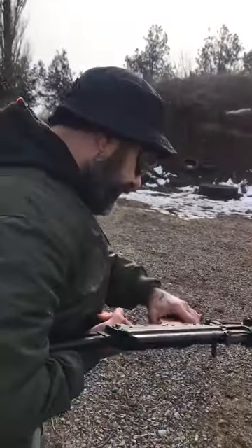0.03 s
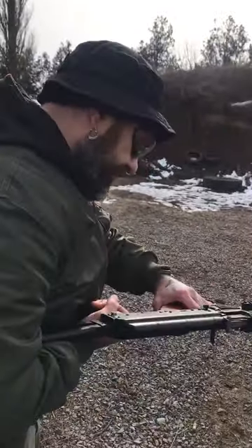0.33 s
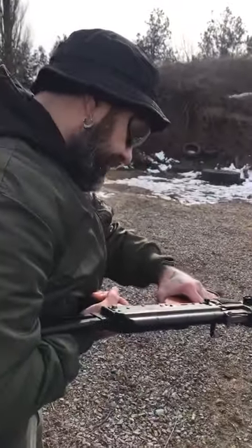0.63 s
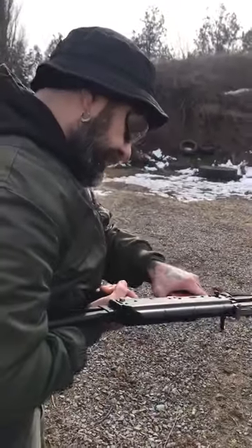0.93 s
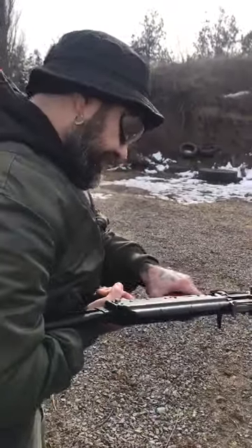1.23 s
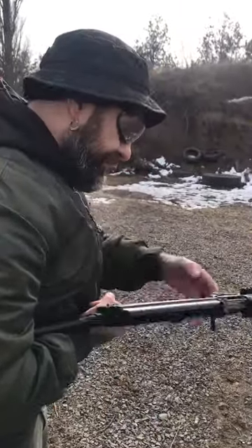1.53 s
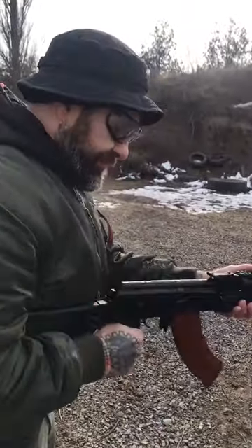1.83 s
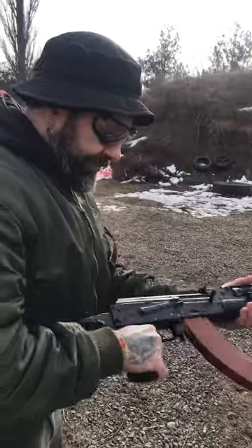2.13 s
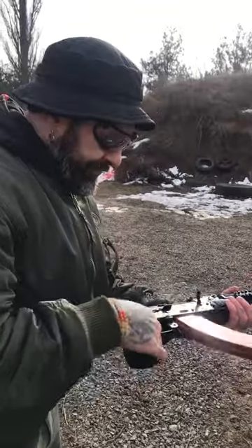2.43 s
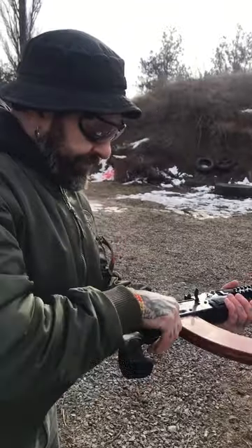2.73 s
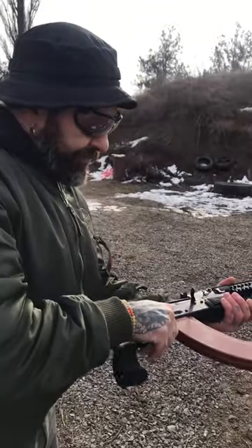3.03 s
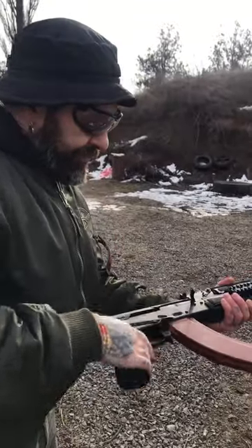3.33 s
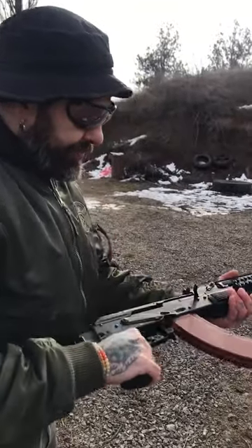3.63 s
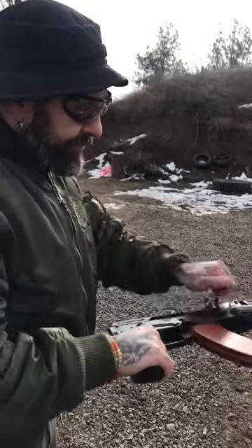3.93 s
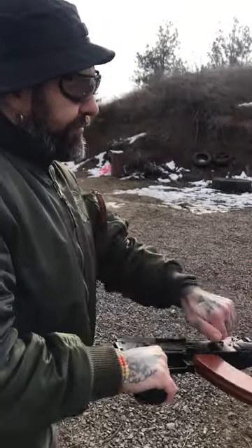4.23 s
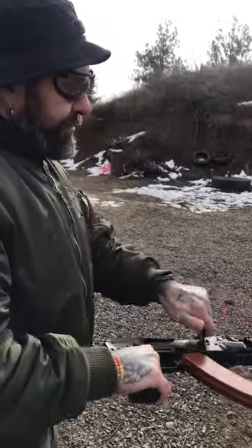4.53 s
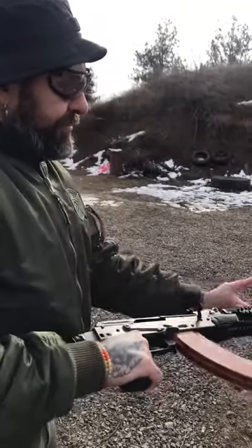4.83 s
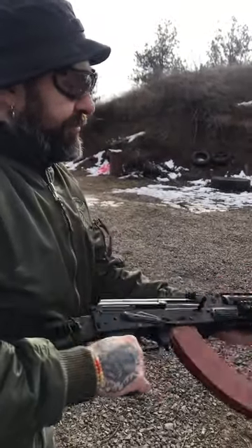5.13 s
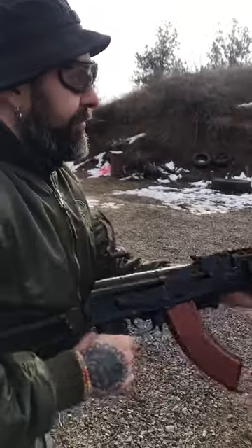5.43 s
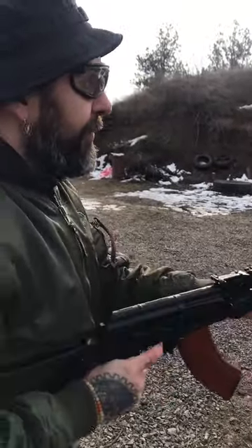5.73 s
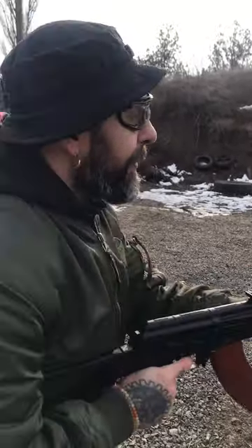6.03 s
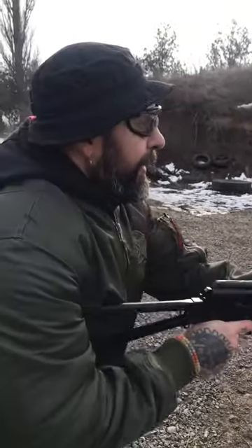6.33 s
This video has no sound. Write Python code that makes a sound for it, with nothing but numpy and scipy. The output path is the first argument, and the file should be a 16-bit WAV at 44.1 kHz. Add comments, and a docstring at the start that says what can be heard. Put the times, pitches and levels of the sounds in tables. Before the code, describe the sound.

Close metallic clicks, rattles and clacks of a rifle being loaded and cocked, with nylon sleeve swishes and wind rumbling on the microphone.

```python
"""A nylon sleeve swishes and creases in the breeze, and a rifle magazine knocks home, close to the microphone.
Loose steel parts rattle, the safety lever snaps down, then the bolt is hauled back and slams shut.
Each contact is a crack of noise that sets the steel ringing; the jacket rubs, crinkles and finally squeaks.
Wind buffets the microphone, and the gravel and earth banks of the range send back a faint echo."""
import sys
import numpy as np
from scipy import signal
from scipy.fft import rfft, irfft, next_fast_len
from scipy.io import wavfile

SR = 44100
rng = np.random.default_rng(int(sys.argv[2]) if len(sys.argv) > 2 else 0)


def wav_record(signal):
    """Record a signal, one row per channel, as 16-bit PCM in the file named by sys.argv[1]."""
    frames = np.transpose(np.atleast_2d(signal))
    bounded = np.clip(frames, -1, 1)
    # unit amplitude maps onto the largest positive 16-bit level
    quanta = np.round(bounded * 32767).astype(np.int16)
    wavfile.write(sys.argv[1], SR, quanta)


N = 290883
TIME = np.arange(N) / SR


def from_db(db):
    """Decibels to gain."""
    return 10 ** (np.asarray(db) / 20)


def rms_one(x):
    """Scale to an rms of one."""
    return x / np.sqrt(np.mean(x ** 2) + 1e-20)


def automation(rows):
    """Each column of a breakpoint curve at every sample."""
    times, *columns = np.transpose(rows)
    return [np.interp(TIME, times, column) for column in columns]


def swells(rows, steepness=2):
    """Gain that swells and fades for each row of middle_s, length_s, level_db."""
    return sum(from_db(db) * np.exp(-np.minimum(np.abs(2 * (TIME - middle) / length) ** steepness, 20))
               for middle, length, db in rows)


def taps(rows):
    """One impulse for each blow, as strong as the blow."""
    out = np.zeros(N)
    for start, db, *_ in rows:
        out[round(start * SR)] += from_db(db)
    return out


def drift(rate_hz):
    """A random wander with a spread of about one."""
    knots = rng.standard_normal(N // 20)
    return np.interp(TIME * rate_hz, np.arange(len(knots)), knots)


def spike_sizes(spread_db):
    """Random sizes of either sign: many small, a few large."""
    return from_db(spread_db * np.minimum(rng.exponential(1, N), 3)) * rng.choice([-1, 1], N)


def band(x, low_hz, high_hz, order=2):
    """Causal band-pass."""
    sos = signal.butter(order, [low_hz, min(high_hz, .45 * SR)], "band", fs=SR, output="sos")
    return signal.sosfilt(sos, x + 1e-18)


def coloured(x, spectrum):
    """Give a steady noise a spectrum; rms one."""
    hz, db = np.transpose(spectrum)
    size = next_fast_len(N)
    log_hz = np.log(np.maximum(np.fft.rfftfreq(size, 1 / SR), 1))
    gain = from_db(np.interp(log_hz, np.log(hz), db, left=-90, right=-90))
    return rms_one(irfft(rfft(x, size) * gain, size)[:N])


def body(force, resonances, direct_db):
    """A steel part passes the crack and sings briefly at its two-pole resonances."""
    out = from_db(direct_db) * force
    for hz, width_hz, db in resonances:
        radius = np.exp(-np.pi * width_hz / SR)
        poles = [1, -2 * radius * np.cos(2 * np.pi * hz / SR), radius ** 2]
        gain = from_db(db) * (1 - radius ** 2) / 2
        out += signal.lfilter([gain, 0, -gain], poles, force + 1e-18)
    return out


def ring(blows, modes):
    """Every blow sets the modes ringing as dying sines."""
    out = np.zeros(N)
    for hz, db, t60 in modes:
        radius, angle = from_db(-60 / (t60 * SR)), 2 * np.pi * hz / SR
        poles = [1, -2 * radius * np.cos(angle), radius ** 2]
        out += signal.lfilter([0, from_db(db) * np.sin(angle)], poles, blows + 1e-18)
    return out


def contacts(rows, t60_s, dulling, crack_db, crack_s, rise_s, grain_db, bands_db, ping_db=-13):
    """Each contact is a crack and a dying chatter; dulling gives gentler touches a larger share of lows."""
    t = np.arange(SR // 6) / SR
    edges_hz = np.array([(740, 1460), (1700, 4600), (4900, 12000)])
    low_db, mid_db, high_db = bands_db
    decay = from_db(-60 * t / t60_s)
    crack = from_db(crack_db) * np.exp(-t / crack_s)
    bite = 1 - np.exp(-t / rise_s)   # parts that slide into each other take a moment to bite
    force = np.zeros((3, N + len(t)))
    for start, db, treble_db in rows:
        grain = from_db(grain_db * np.repeat(rng.standard_normal(len(t)), SR // 1500)[:len(t)])
        burst = rng.standard_normal((3, len(t))) * (grain * decay + crack) * bite
        burst /= np.sqrt(np.mean(burst[:, :SR // 250] ** 2, axis=1, keepdims=True))   # attack at rms one
        # every point of contact favours a few modes of its own in the mids and highs
        pings_hz = rng.uniform(edges_hz[1:, :1], edges_hz[1:, 1:], size=(2, 3))
        pings = np.sin(2 * np.pi * pings_hz[..., None] * t).sum(axis=1)
        burst[1:] += from_db(ping_db) * pings * decay * bite
        tone_db = np.array([[low_db - dulling * db], [mid_db], [high_db + treble_db]])
        at = round(start * SR)
        force[:, at:at + len(t)] += burst * from_db(db + tone_db)
    return sum(band(part[:N], low, high) for part, (low, high) in zip(force, edges_hz))


# tone of the open air: frequency_hz, density_db
AIR_SPECTRUM = [(35, -29.5), (60, -0.5), (139, -18.5), (432, -22), (858, -21), (1310, -30.5), (3470, -28.5),
                (8800, -43.5), (12000, -43), (15600, -67.5), (22000, -120)]


def open_air(level_db=-63.5):
    """A quiet, steady bed of low noise."""
    return from_db(level_db) * coloured(rng.standard_normal(N), AIR_SPECTRUM)


# the wind's deep rumble and its low-mid buffeting: frequency_hz, density_db
RUMBLE_SPECTRUM = [(20, -32), (35, -8), (55, 1), (85, -3.5), (125, -11.5), (180, -20), (320, -41)]
BUFFET_SPECTRUM = [(60, -12.5), (110, -2), (140, 4), (230, -1), (350, -5.5), (520, -18), (800, -32),
                   (1300, -44)]
# rise and fall of the breeze: time_s, strength_db
BREEZE_CURVE = [(0, -34.5), (.5, -42.5), (.75, -39.5), (1.05, -43.5), (1.5, -49.5), (1.7, -38.5),
                (2.25, -32.5), (2.7, -50), (3.0, -43.5), (3.3, -44.5), (3.5, -48.5), (4.15, -58),
                (4.28, -39), (4.7, -41), (5.25, -41.5), (5.5, -56), (6.1, -55), (6.6, -54)]
# gusts on top of it, and the dull low thumps of the magazine going home at 0.257 s and 1.205 s: middle_s,
# length_s, rumble_db, buffet_db
LOW_SWELLS = [(0.257, 0.065, -28.5, -63), (0.861, .12, -37.5, -53.5), (1.205, .22, -45, -73.5),
              (1.624, 0.048, -40, -65), (2.358, 0.15, -26, -30.5), (2.492, 0.047, -29, -65),
              (2.822, 0.054, -40.5, -67), (3.072, 0.051, -37, -49), (3.366, 0.11, -47, -90),
              (3.955, 0.015, -42, -53), (4.383, 0.18, -37, -33.5), (4.581, 0.11, -41.5, -38.5),
              (4.791, 0.072, -32, -34.5), (5.033, .18, -41, -50), (5.313, 0.068, -40, -75),
              (6.302, 0.086, -49.5, -58)]
# single puffs: middle_s, level_db
WIND_PUFFS = [(2.336, -19.5), (2.367, -22), (3.08, -21.5), (4.409, -22), (4.78, -23)]


def wind(buffet_follows=.55, eddy_db=3, eddies_per_s=30, puff_hz=197):
    """Eddies rumble unevenly on the microphone, gusts also buffet it, and the magazine's heavier knocks swell
    as dull low thumps; a puff is one swing of pressure."""
    breeze_db, = automation(BREEZE_CURVE)
    rumble = from_db(breeze_db - 1)
    rumble += swells([(s, length, db) for s, length, db, _ in LOW_SWELLS], steepness=4)
    buffet = from_db(buffet_follows * breeze_db - 40)
    buffet += swells([(s, length, db) for s, length, _, db in LOW_SWELLS], steepness=4)
    out = rumble * coloured(rng.standard_normal(N), RUMBLE_SPECTRUM)
    out += buffet * coloured(rng.standard_normal(N), BUFFET_SPECTRUM)
    out *= from_db(eddy_db * drift(eddies_per_s))
    for middle, db in WIND_PUFFS:
        cycles = np.clip((TIME - middle) * puff_hz, -5, 5)
        out += from_db(db) * np.sin(2 * np.pi * cycles) * np.exp(-(cycles / .69) ** 2)
    return out


# slapback from the earth banks: delay_s, level_db
BANK_ECHOES = [(0.051, -29), (0.073, -32), (0.116, -39), (.208, -57), (0.226, -43)]


def outdoors(x, bounce_s=.0071, scatter_db=-31, scatter_t60_s=.15, smear_s=.0069):
    """Add a bounce off the ground, dull scatter from gravel and smeared echoes from the banks."""
    t = TIME[:SR // 2]
    scatter = rng.standard_normal(len(t)) * from_db(-60 * t / scatter_t60_s) * (t > .008)
    response = from_db(scatter_db) * scatter / np.linalg.norm(scatter)
    for delay, db in BANK_ECHOES:
        echo = rng.standard_normal(len(t)) * np.exp(-np.abs(t - delay) / smear_s)
        response += from_db(db) * band(echo / np.linalg.norm(echo), 1100, 3600, order=1)
    far = band(signal.fftconvolve(x, response)[:N], 700, 6500, order=1)
    bounce = np.interp(TIME - bounce_s, TIME, x, left=0)
    return x + from_db(-22) * bounce + far


# nylon squeaks on nylon: time_s, pitch_hz, level_db
SQUEAK_CURVE = [(6.15, 1150, -66), (6.2, 1500, -55), (6.25, 1660, -53), (6.29, 1670, -49),
                (6.33, 1680, -76)]


def squeak(waver=.049, flutter_db=4.8):
    """The weave catches at a quick, unsteady rate that rises with the speed of the sleeve."""
    hz, db = automation(SQUEAK_CURVE)
    phase = 2 * np.pi * np.cumsum(hz * (1 + waver * drift(390))) / SR
    sliding = (TIME > SQUEAK_CURVE[0][0]) & (TIME < SQUEAK_CURVE[-1][0])
    return sliding * from_db(db + flutter_db * drift(120)) * np.sin(phase)


# the jacket's loudest creases: start_s, level_db, treble_db
CREASE_SNAPS = [(.081, -31, -12), (.13, -34, -14), (.143, -34.5, -28), (.2, -23, -16), (.213, -24.5, -33),
                (.293, -35, -24), (.36, -38, -6), (5.761, -24, -22), (5.779, -34, -25), (5.791, -34.5, -24)]


def creases():
    """A fold snaps as it gives way, and the padding flaps."""
    snaps = contacts(CREASE_SNAPS, t60_s=.017, dulling=0, crack_db=17.5, crack_s=.00027,
                     rise_s=.0001, grain_db=12, bands_db=(6.5, -3.5, -4))
    flaps = band(from_db(25.5) * taps(CREASE_SNAPS), 157, 485)
    return snaps + flaps


# the nylon's midrange rustle and bright hiss: frequency_hz, density_db
RUSTLE_SPECTRUM = [(150, -6), (480, -5.5), (850, 1.5), (1400, -0.5), (2800, -3.5), (4500, -9.5),
                   (8000, -21)]
HISS_SPECTRUM = [(1800, -10.5), (4000, 0), (6500, -1.5), (9500, -2), (12000, -7.5)]
# each arm move swishes the sleeve: middle_s, length_s, rustle_db, hiss_above_rustle_db
SLEEVE_SWISHES = [(0.173, 0.25, -56, -4), (0.737, 0.34, -66.5, 4), (1.922, 0.42, -61, -0.5),
                  (3.369, 0.11, -64, 5), (4.474, 0.31, -59, 3), (5.151, 0.12, -71, 8.5),
                  (5.431, 0.25, -62.5, -4), (5.656, 0.062, -47.5, -14), (5.726, 0.12, -63, -6.5),
                  (6.186, 0.66, -57, -4.5), (6.311, 0.026, -42, -4.5), (6.59, 0.33, -58.5, -4)]


def sleeves(resting_rustle_db=-71.5, resting_hiss_db=-72, max_crinkles_per_s=55, brisk_db=-57):
    """Nylon slides with a smooth hiss; the brisker the rub, the more often its folds crinkle."""
    rub = from_db(resting_rustle_db) + swells(row[:3] for row in SLEEVE_SWISHES)
    slide = from_db(resting_hiss_db)
    slide += swells((s, length, db + above) for s, length, db, above in SLEEVE_SWISHES)
    briskness = rub / from_db(brisk_db)
    sizes = from_db(27) * spike_sizes(spread_db=3)
    buckles = rng.random(N) < max_crinkles_per_s * np.minimum(briskness, 1) ** 2 / SR
    # past a brisk rub the hiss still grows, but the folds snap no louder
    crinkles = sizes * buckles / np.maximum(briskness, 1)
    rustle = coloured(rng.standard_normal(N) + crinkles, RUSTLE_SPECTRUM)
    hiss = coloured(rng.standard_normal(N) + from_db(-10) * crinkles, HISS_SPECTRUM)
    flicker = from_db(3 * drift(35))
    return (rub * rustle + slide * hiss) * flicker


# a hand pats the fore grip: middle_s, length_s, level_db
GRIP_PAT = [(4.779, 0.007, -40)]


def pat():
    """A palm lands with a short, dull thump."""
    return swells(GRIP_PAT) * rms_one(band(rng.standard_normal(N), 200, 900, order=3))


# clinks of the loose parts: start_s, level_db, treble_db
RATTLE_HITS = [(1.908, -20, -14), (2.042, -33.5, -16), (2.366, -33.5, -4.5), (2.38, -20, -24),
               (2.399, -23, -11), (3.403, -21, -9.5), (3.42, -27.5, -15), (3.471, -15, -11),
               (3.509, -23.5, -14), (3.523, -20.5, -13), (4.983, -35.5, -11), (5.408, -31.5, -12),
               (5.438, -29, -40), (5.489, -34.5, -16.5)]
# their resonances: pitch_hz, width_hz, gain_db
RATTLE_RESONANCES = [(954, 44, 11.5), (2197, 12.4, 7.5), (2385, 14, 3.5), (2820, 600, -7.5),
                     (4160, 155, -1), (4475, 11, -9), (5950, 1100, -16), (8600, 100, -6), (8800, 33, -22)]
# their ringing tails: pitch_hz, level_db, t60_s
RATTLE_TAILS = [(965, -21, 0.336), (2184, -23, 0.17), (2350, -8, 0.14), (2610, 0, 0.073), (2906, -14, 0.18),
                (4160, -37, 0.15)]


def rattles():
    """Loose steel parts clink and ring as the rifle is turned."""
    clinks = contacts(RATTLE_HITS, t60_s=.073, dulling=.81, crack_db=-2, crack_s=.0018,
                      rise_s=.00047, grain_db=0, bands_db=(-34.5, -1.5, 7))
    tails = from_db(-19) * ring(taps(RATTLE_HITS), RATTLE_TAILS)
    return body(clinks, RATTLE_RESONANCES, direct_db=-10) + tails


# ringing tails of the action: pitch_hz, level_db, t60_s
ACTION_TAILS = [(895, -10, 0.098), (1770, -10.5, 0.12), (2170, -1, 0.1), (2580, -25.5, 0.56),
                (2745, -13.5, .15), (3200, -27, .5), (3170, -9, 0.11), (4340, -21.5, 0.3),
                (5400, -17.5, 0.2), (7000, -24.5, 0.29)]


def action_ring(hits, send_db):
    """Magazine, lever and bolt all set the same steel action ringing."""
    return ring(from_db(send_db) * taps(hits), ACTION_TAILS)


def jolt(force, send_db):
    """The whole weapon thuds under the heavier blows."""
    return band(from_db(send_db) * force, 150, 420)


# steel slides on steel just before and after it catches: middle_s, length_s, level_db
STEEL_SCRAPES = [(.28, 0.086, -56), (.392, 0.0065, -49), (0.499, 0.026, -45.5), (0.548, 0.048, -47.5),
                 (0.833, .06, -50.5), (0.905, .05, -50), (0.955, 0.023, -48), (1.055, .01, -52.5),
                 (1.147, 0.028, -41.5), (1.23, 0.11, -52.5), (1.378, 0.055, -59.5), (4.258, .016, -46),
                 (4.506, .014, -42)]


def scrapes(slips_per_s=1400):
    """Tiny uneven slips, dense enough to grind, swell and fade with each push."""
    slips = spike_sizes(spread_db=4.5) * (rng.random(N) < slips_per_s / SR)
    return rms_one(band(slips, 520, 4200)) * swells(STEEL_SCRAPES)


# knocks and latch clicks of the magazine: start_s, level_db, treble_db
MAGAZINE_HITS = [(.2335, -12.5, -20.5), (.394, -13, -18), (.424, -31, -19), (.525, -29, -12),
                 (.544, -28.5, -7.5), (.8635, -13.5, -15), (.9, -29.5, -14), (1.058, -25, -3.5),
                 (1.156, -15, -1), (1.159, -5, -4), (1.163, -11.5, -6), (1.436, -45.5, -35),
                 (1.668, -36, -38), (1.677, -31.5, -41)]
# its shell: pitch_hz, width_hz, gain_db
MAGAZINE_RESONANCES = [(867, 34, 4.5), (1130, 49, 0), (1386, 130, 3.5), (1933, 54, 3), (2190, 130, -3),
                       (3187, 110, -11.5), (4400, 240, -10.5), (5500, 44, -3), (8860, 250, -2.5),
                       (8940, 53, -6.5)]


def magazine():
    """The magazine knocks and scrapes in its well, then latches; the same shell also carries the brief slides
    of steel as the bolt starts each stroke."""
    knocks = contacts(MAGAZINE_HITS, t60_s=.045, dulling=.3, crack_db=5, crack_s=.00077,
                      rise_s=.00014, grain_db=4, bands_db=(-12, -5, 1))
    shell = body(knocks + from_db(3.5) * scrapes(), MAGAZINE_RESONANCES, direct_db=-4)
    return shell + action_ring(MAGAZINE_HITS, send_db=-29) + jolt(taps(MAGAZINE_HITS), send_db=9.5)


# clicks of the safety lever: start_s, level_db, treble_db
LEVER_HITS = [(2.887, -28.5, -11.5), (2.974, -23.5, -4.5), (2.9792, 1, -7), (2.9993, -2.5, -4.5),
              (3.204, -22.5, -6)]
# its steel: pitch_hz, width_hz, gain_db
LEVER_RESONANCES = [(906, 44, 6), (1175, 45, -0.5), (1451, 79, 4), (3040, 270, -5), (4410, 200, 1),
                    (6310, 480, 2.5), (6740, 220, 4.5), (8760, 300, -3.5), (9700, 240, -3.5)]


def safety_lever():
    """The lever snaps through its detents with sharp cracks."""
    clicks = contacts(LEVER_HITS, t60_s=.043, dulling=.25, crack_db=11, crack_s=.001,
                      rise_s=.00036, grain_db=3.5, bands_db=(-13, -6, 0))
    return body(clicks, LEVER_RESONANCES, direct_db=-6.5) + action_ring(LEVER_HITS, send_db=-41)


# the bolt carrier chatters along its rails, back and then forward: start_s, end_s, first_db, last_db
CARRIER_STROKES = [(4.2615, 4.353, -9.5, -12), (4.528, 4.5628, -19.5, -8.5)]
# it rides over the hammer, hits its stop, is let go and slams shut: start_s, level_db, rebound_hold_s
CARRIER_HITS = [(4.2973, -5, 0), (4.3157, -5, 0), (4.3247, -3, 0.00082), (4.3513, -0.5, 0.0017),
                (4.368, -1, 0.0042), (4.515, -14, 0), (4.561, -2.5, 0.027)]


def bolt_blows(knocks=9, jitter=.2, rail_treble_db=-11, stop_treble_db=-6,
               rebound_s=.0045, fade_db_per_s=4199):
    """Uneven knocks along each stroke, and hard blows that rebound for a while and then die quickly."""
    blows = []
    for start, end, first_db, last_db in CARRIER_STROKES:
        for k in range(knocks):
            travel = max(k + jitter * rng.standard_normal() * (k > 0), 0) / knocks
            db = first_db + travel * (last_db - first_db)
            blows.append((start + travel * (end - start), db, rail_treble_db))
    for start, db, hold_s in CARRIER_HITS:
        for after in rebound_s * np.arange(8):
            blows.append((start + after, db - fade_db_per_s * max(after - hold_s, 0), stop_treble_db))
    return blows


# the carrier's weight lands at the end of each stroke: start_s, level_db, treble_db
CARRIER_LANDINGS = [(4.374, -4.5, -13.5), (4.5885, -6, -10)]
# the receiver, damped by the hands: pitch_hz, width_hz, gain_db
RECEIVER_RESONANCES = [(640, 100, 2), (850, 55, 6), (1450, 200, -9.5), (1910, 32, -3.5), (2254, 35, 1),
                       (2400, 54, -2.5), (2585, 35, -2.5), (3040, 87, -5.5), (3190, 55, -2.5),
                       (3850, 22, -5), (4630, 28, -5), (5420, 120, 1), (5780, 72, 2.5), (6330, 390, -0.5),
                       (8190, 150, -5.5)]
# ringing tails of the locking bolt: pitch_hz, level_db, t60_s
LOCK_TAILS = [(2230, -36.5, 0.21), (2550, -56.5, 1.1), (3250, -52.5, 0.45), (8484, -28.5, 0.16),
              (8320, -37, .13)]


def bolt(lock_s=4.5885):
    """The carrier clatters back and slams forward in the receiver, and the bolt rings as it locks."""
    blows = bolt_blows()
    clatter = contacts(blows, t60_s=.047, dulling=.4, crack_db=-.5, crack_s=.0027,
                       rise_s=.00053, grain_db=0, bands_db=(-15.5, -5, -.5))
    weight = contacts(CARRIER_LANDINGS, t60_s=.054, dulling=0, crack_db=-2, crack_s=.0016,
                      rise_s=.00066, grain_db=.5, bands_db=(-2, -10.5, -1))
    receiver = body(clatter + weight, RECEIVER_RESONANCES, direct_db=-1.5)
    lock = ring(taps([(lock_s, 0)]), LOCK_TAILS)
    return receiver + lock + action_ring(blows, send_db=-39.5) + jolt(clatter, send_db=-12.5)


def scene():
    """Air and wind behind, jacket and rifle up close with their echoes; mono."""
    background = open_air() + wind()
    jacket = squeak() + creases() + sleeves()
    rifle = pat() + rattles() + magazine() + safety_lever() + bolt()
    return (background + outdoors(jacket + rifle))[None]


def record(dry, ceiling=.8, cutoff_hz=11750):
    """The loudest peaks are rounded and the top octave is cut."""
    low_pass = signal.ellip(9, .2, 90, cutoff_hz, fs=SR, output="sos")
    return signal.sosfilt(low_pass, ceiling * np.tanh(dry / ceiling))


dry = scene()
out = record(dry)
wav_record(out)
```